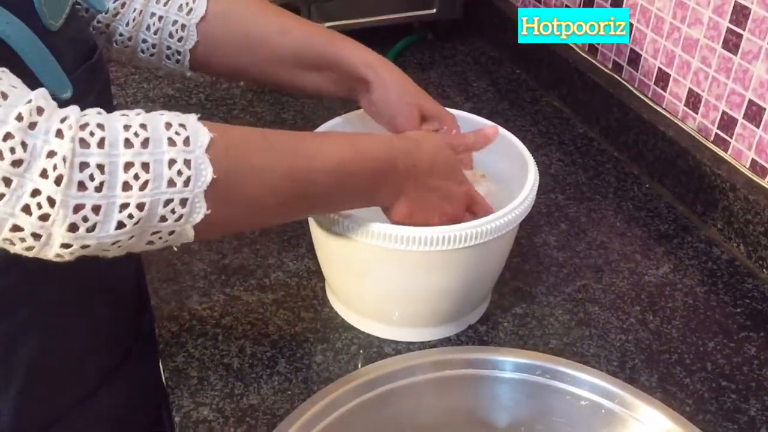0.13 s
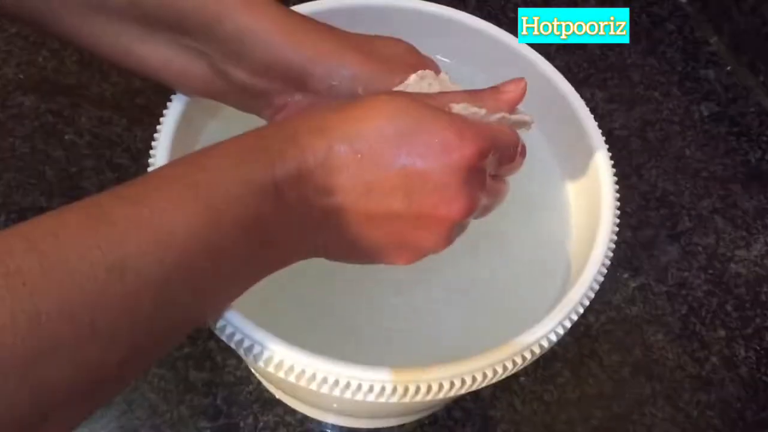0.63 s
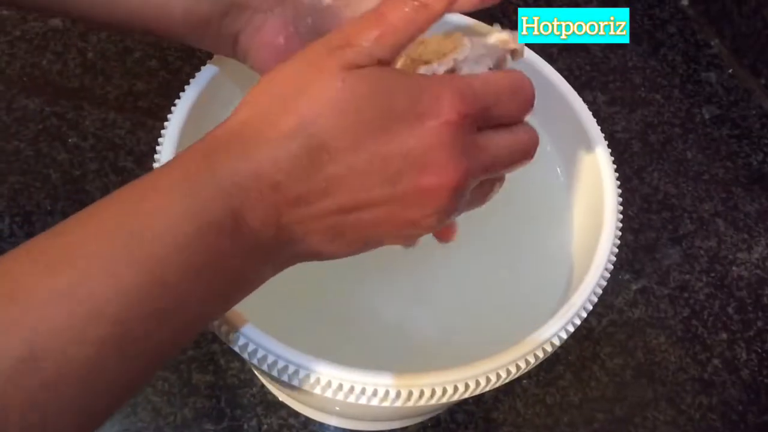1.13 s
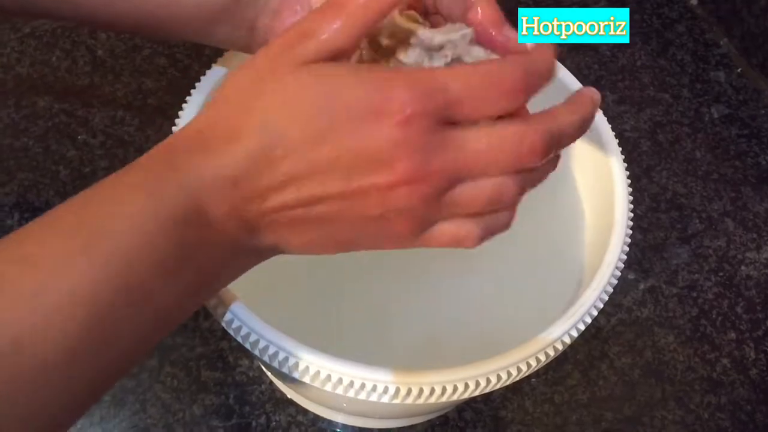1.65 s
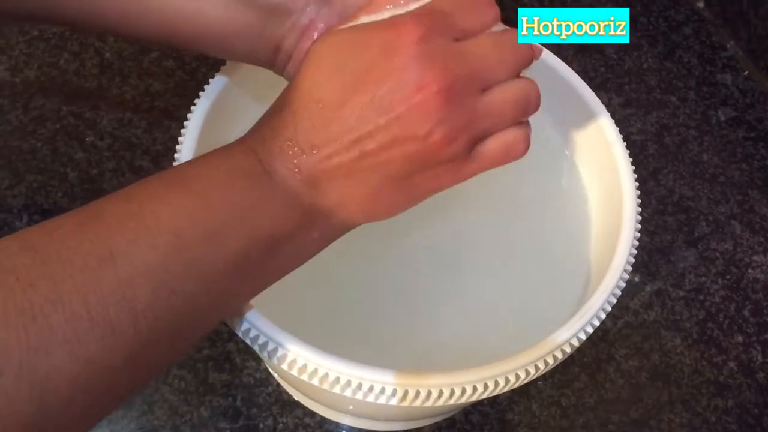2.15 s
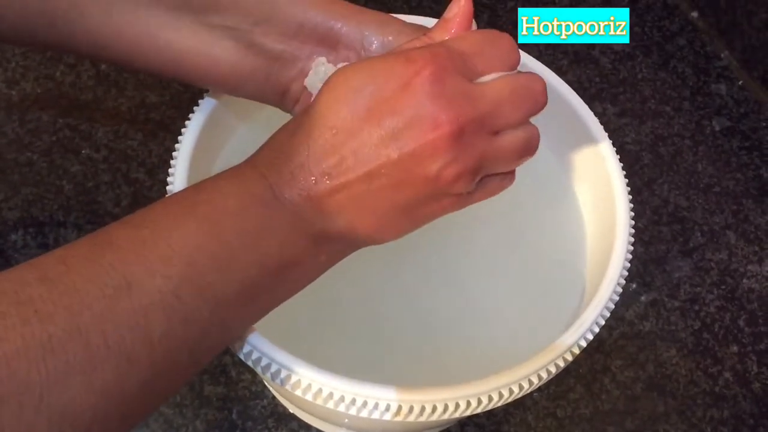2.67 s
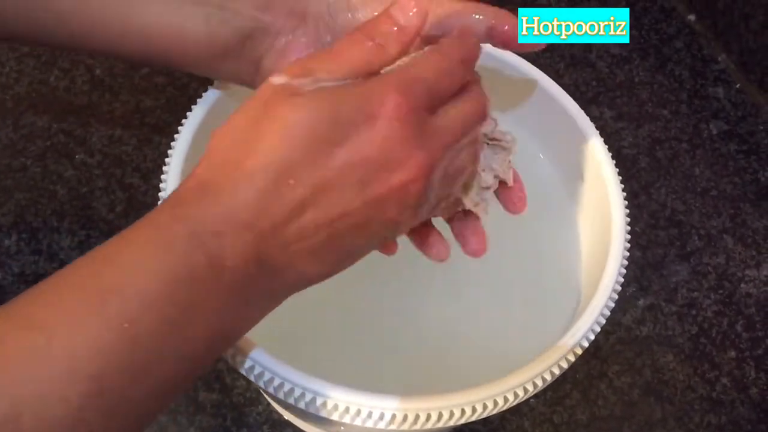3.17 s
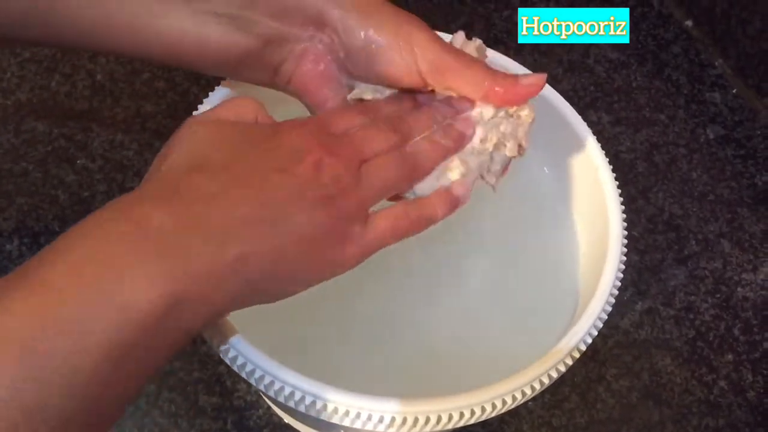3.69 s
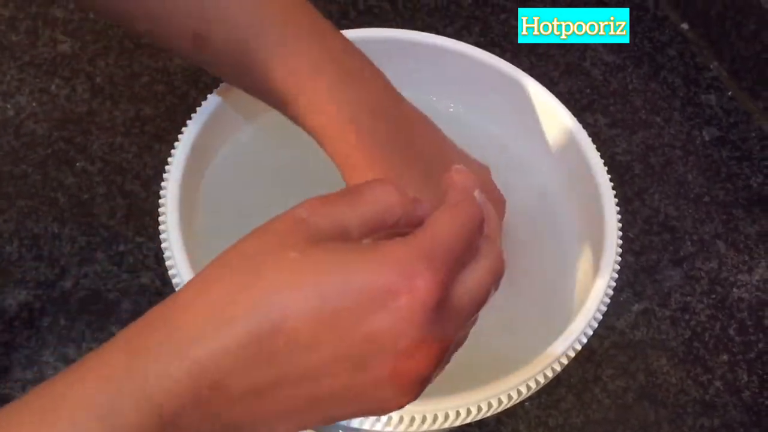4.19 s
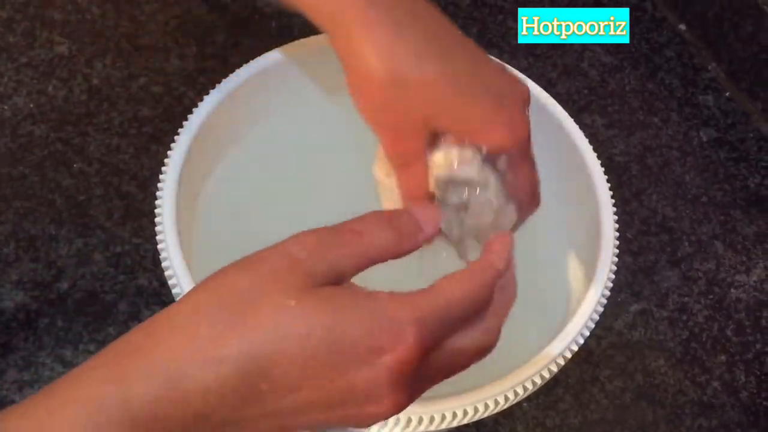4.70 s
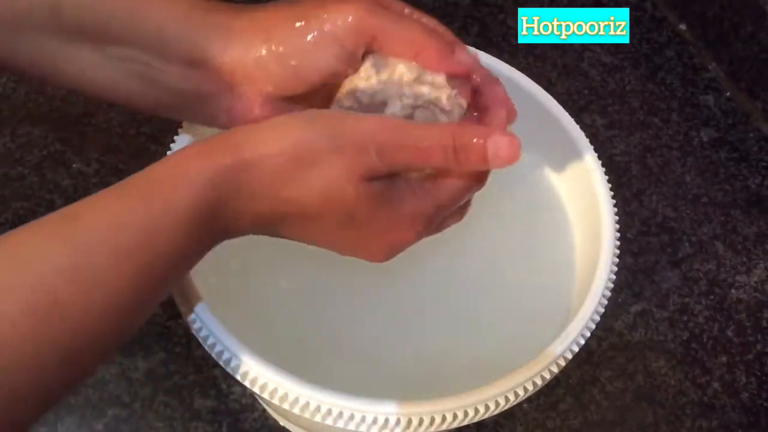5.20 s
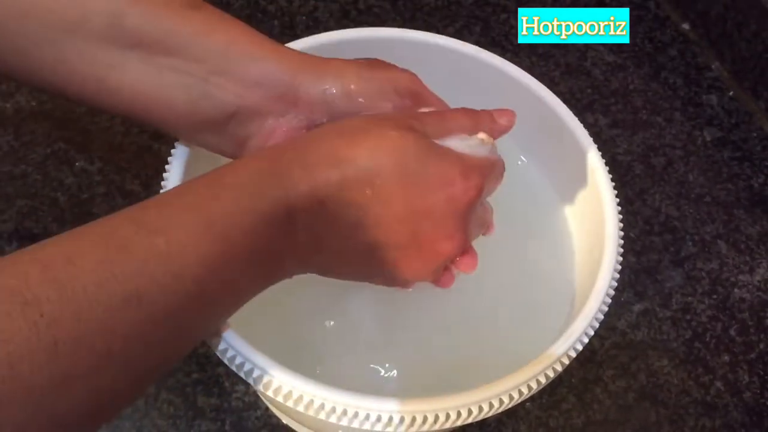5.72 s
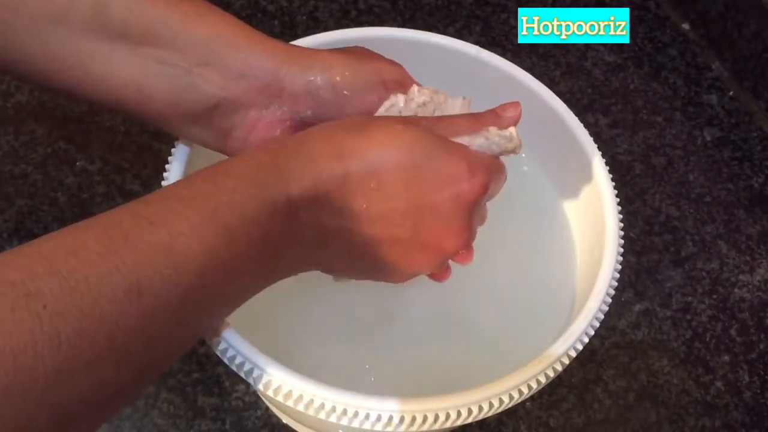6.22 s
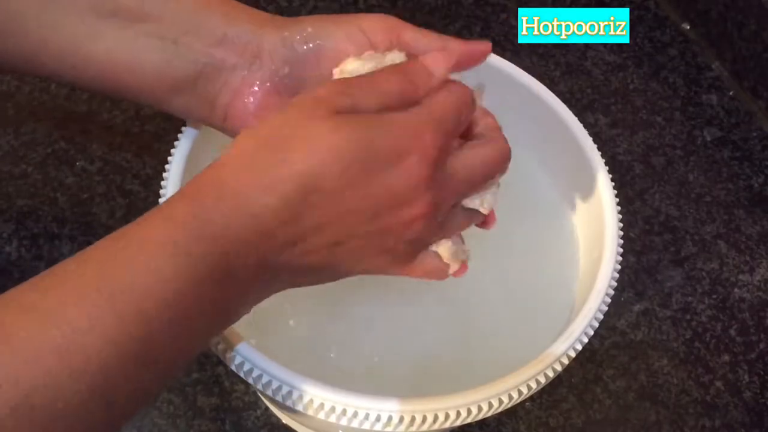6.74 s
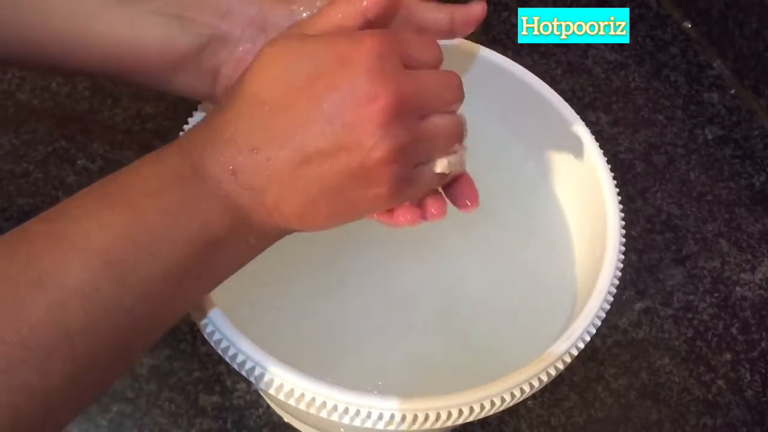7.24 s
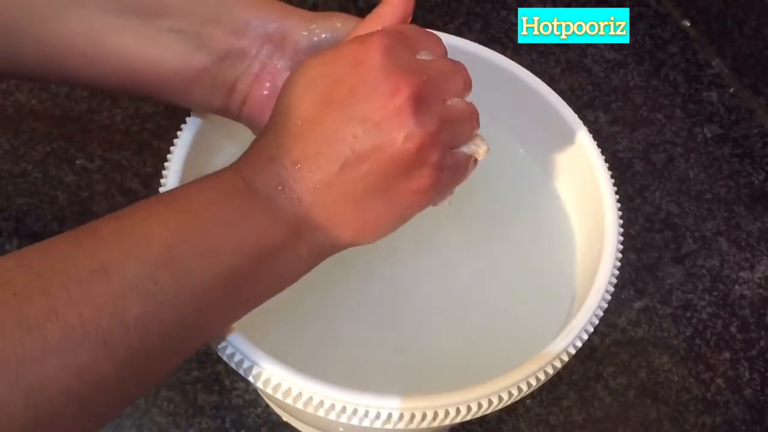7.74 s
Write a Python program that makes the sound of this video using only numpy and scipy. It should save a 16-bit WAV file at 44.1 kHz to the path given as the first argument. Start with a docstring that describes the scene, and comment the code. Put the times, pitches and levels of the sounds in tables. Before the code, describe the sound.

Close wet kneading: splashy gurgles dip briefly to silence, then sharp sticky snaps, crackles and bubbly drips, ending in a squirting squelch.

```python
"""In a small tiled kitchen, two hands squeeze wet dough over a plastic bowl of water, heard close up.
Sticky films smack as bursts of noise ringing in air pockets; drips ring as bubbles of rising pitch.
Swarms of tiny rings make squirting, gurgling and crackling, and short noise bursts make dry ticks.
An appliance drones and hums over air noise and a low rumble; early on, all fades out and in again."""
import sys
import numpy as np
from scipy import signal
from scipy.fft import rfft, irfft, next_fast_len
from scipy.io import wavfile
from scipy.ndimage import uniform_filter1d

SR = 44100
rng = np.random.default_rng(int(sys.argv[2]) if len(sys.argv) > 2 else 0)


def field_ratio(decibels):
    """Amplitude ratio for a level in dB (20 dB per decade); scalars and array-likes work."""
    return 10 ** (np.asarray(decibels, dtype=float) / 20)


def store_pcm(level_fs):
    """Save levels as 16-bit WAV."""
    pcm = np.round(np.clip(level_fs, -1, 1) * 32767).astype(np.int16)
    wavfile.write(sys.argv[1], SR, np.atleast_2d(pcm).T)


N = 347067  # length in samples
TIME = np.arange(N) / SR  # s
CUT_S = 0.53  # the middle of the fade, where the rumble also changes


def unit(x):
    """Scales a sound to rms 1."""
    return x / np.sqrt(np.mean(x ** 2) + 1e-20)


def noise():
    """White noise as long as the scene."""
    return rng.standard_normal(N)


def along(points, hz):
    """Reads values between (f/Hz, value) points, on a log frequency axis."""
    f, value = np.transpose(points)
    return np.interp(np.log(hz + 1), np.log(f + 1), value)


def filtered(x, response):
    """Shapes a sound by a response that depends on frequency."""
    size = next_fast_len(len(x) + 4096)  # spare room keeps the tail from wrapping onto the start
    spectrum = rfft(x, size) * response(np.fft.rfftfreq(size, 1 / SR))
    return irfft(spectrum, size)[:len(x)]


def resonance(f, hz, width_hz):
    """Response of one thing that rings at hz, with peak gain 1; a wider peak dies away sooner."""
    return 1j * f * width_hz / (hz * hz - f * f + 1j * f * width_hz + 1e-9)


def blips(s, hz, gain, cycles, rise, swell, size):
    """Sums dying sine rings that start at s, swell over some cycles and climb in pitch."""
    t = np.arange(size) / SR
    age = t * (hz / cycles)[:, None]  # 1 when the given cycles have passed
    turns = hz[:, None] * t * (1 + rise * np.minimum(age, 2) / 2)  # pitch is up by the share rise at age 1
    onset = (1 - np.exp(-t * hz[:, None] / swell)) ** 2
    ring = gain[:, None] * np.exp(-age * 2) * onset * np.sin(2 * np.pi * turns)
    where = np.round(s * SR).astype(int)[:, None] + np.arange(size)
    return np.bincount(where.ravel(), ring.ravel(), N + SR)[:N]


def swarm(hz, count, spread, cycles, swell, scatter_db, clump_db, size):
    """Random blips around a moving pitch, in short spurts that share pitch and loudness, rms 1."""
    s = rng.uniform(0, N / SR, count)
    sample = (s * SR).astype(int)
    spurt = sample // 350  # a spurt lasts 350 samples, about 8 ms
    spurt_db, spurt_pitch = rng.standard_normal((2, N // 350 + 1))[:, spurt]
    pitch = hz[sample] * np.exp(spread * (spurt_pitch + rng.standard_normal(count)))
    scatter = np.minimum(rng.exponential(size=count), 3)  # a few blips stand out, within a limit
    gain = field_ratio(scatter_db * scatter + clump_db * spurt_db)
    rings = blips(s, np.clip(pitch, 200, 15500), gain, np.full(count, cycles), .1, swell, size)
    return unit(rings)


def swells(rows, rise):
    """Gain of spells that climb and die away evenly in dB; rise is climb time over fade time."""
    s, db, fade_s = np.transpose(rows)[:3, :, None]
    after = (TIME - s) / np.maximum(fade_s, .01)
    drop_db = 20 * np.maximum(after, -after / rise)
    return np.sqrt(np.sum(field_ratio(db - drop_db) ** 2, axis=0))


def moving_pitch(rows):
    """Pitch that glides from peak to peak of the spells."""
    return np.interp(TIME, [row[0] for row in rows], [row[-1] for row in rows])


def air():
    """Broad room noise whose loudness varies softly in patches of time and pitch."""
    # spectrum of the quiet kitchen, only its shape counts: (f/Hz, level per Hz/dB)
    air_shape = [(45, -59), (75, -1.5), (150, -13), (250, -14.5), (420, -15.5), (750, -9.5), (1100, -14.5),
                 (2400, -18.5), (6000, -24), (10000, -22), (16000, -29)]
    z = signal.stft(noise(), nperseg=512)[2]
    patches = uniform_filter1d(rng.standard_normal(z.shape), 14, 0)  # smooth over pitch
    patches = uniform_filter1d(patches, 16, 1)  # smooth over time
    hiss = signal.istft(z * field_ratio(1.1 * unit(patches)), nperseg=512)[1][:N]
    hiss = unit(filtered(hiss, lambda f: field_ratio(along(air_shape, f))))
    return field_ratio(-67.5) * hiss


def drone():
    """The appliance's unsteady bands: noise passed twice through each narrow resonance."""
    # bands of the appliance: (f/Hz, width of each pass/Hz, rms level/dB)
    drone_bands = [(335, 62, -75), (370.5, 11, -79), (47.1, 16.5, -68.5)]
    out = np.zeros(N)
    for hz, width_hz, db in drone_bands:
        band = filtered(noise(), lambda f: resonance(f, hz, width_hz) ** 2)
        out += field_ratio(db) * unit(band)
    return out


def hum():
    """The appliance's thin hum: a 301 Hz sine whose loudness and phase waver slowly together."""
    waver = unit(filtered(noise(), lambda f: f < 5))  # changes slower than 5 Hz
    level = field_ratio(-74.5 + 0.5 * waver) * np.sqrt(2)  # the root turns rms into peak
    return level * np.sin(2 * np.pi * 301 * TIME + 0.85 * waver)


def rumble():
    """Low rumble of the building: deep noise that drops at the cut and partly swells back."""
    first_db, low_db, high_db = -48, -67, -59  # before the cut, after it, after the swell
    swell_s = 2.45  # middle of a swell 0.3 s long
    swollen = np.clip((TIME - swell_s) / .3 + .5, 0, 1)
    level_db = np.where(TIME < CUT_S, first_db, low_db + (high_db - low_db) * swollen)

    def deep(f):
        low = resonance(f, 14, 25) / (1 + (f / 40) ** 2)
        return low + field_ratio(-24) * resonance(f, 140, 400) ** 2

    return field_ratio(level_db) * unit(filtered(noise(), deep))


def squirts():
    """Pressed dough squirts water through its pores: swarms of tiny bubble rings with a high mist."""
    # spells of squirting: (peak t/s, peak level/dB, time to fade by 20 dB/s, pitch f/Hz)
    squirt_spells = [(0, -49.5, 0.31, 9240), (.2, -65, 1.6, 7740), (2.02, -66, 0.6, 4500),
                     (5.59, -61, 0.33, 4180), (7.41, -48.5, 0.13, 4360), (7.48, -39.5, 0.1238, 5730),
                     (7.69, -50, 0.32, 6560), (7.78, -41, 0.1, 6500)]
    squirt = swarm(moving_pitch(squirt_spells), 24000, spread=.16, cycles=6, swell=1.2,
                   scatter_db=4, clump_db=4, size=160)
    mist = swarm(np.full(N, 10500.0), 6000, spread=.2, cycles=3, swell=.8,
                 scatter_db=4, clump_db=3, size=80)
    return swells(squirt_spells, rise=0.56) * (squirt + field_ratio(-3) * mist)


def gurgles():
    """Water gurgles in the bowl: swarms of larger, lower bubble rings with a finer fizz."""
    # spells of gurgling: (peak t/s, peak level/dB, time to fade by 20 dB/s, at least 0.01, pitch f/Hz)
    gurgle_spells = [(.1, -52, 0.49, 716), (.2, -49.5, 0.02, 720), (1.945, -49, -0.22, 773),
                     (1.99, -52.5, 0.5, 786), (6.42, -57, -0.7, 786), (7.3, -59.5, 0.3, 707),
                     (7.35, -50.5, 0.21, 672), (7.46, -46, 0.14, 728)]
    gurgle = swarm(moving_pitch(gurgle_spells), 4000, spread=.1, cycles=5, swell=.8,
                   scatter_db=2, clump_db=2, size=1200)
    fizz = swarm(np.full(N, 2100.0), 6000, spread=.3, cycles=7, swell=.6,
                 scatter_db=4, clump_db=3.5, size=500)
    return swells(gurgle_spells, rise=0.19) * (gurgle + field_ratio(-2.5) * fizz)


def smacks():
    """A film tears in a burst of crackle that rings its air pocket, over a duller splat."""
    # wet smacks of skin and dough: (t/s, level/dB, pocket pitch f/Hz, splat level against the
    # pocket/dB, pocket width as a share of its pitch, kept within 0.05 and 0.7 below)
    smack_table = [(.003, -31, 3850, -7, 0.84), (0.017, -39, 4900, -10, 1), (0.069, -37.5, 4260, 6, 0.37),
                   (0.161, -36, 11100, -25, 0.26), (.19, -33, 4350, 2, 0.82),
                   (0.247, -37.5, 9300, -5, 0.13), (0.636, -40.5, 9300, -30, 0.1),
                   (.672, -42.5, 5330, -18, 0.13), (0.9975, -39.5, 12200, -8, 0.89),
                   (1.064, -38.5, 4700, -9.5, 0.8), (1.1136, -36.5, 9400, -40, 0.88),
                   (1.334, -48, 10500, -30, .5), (1.467, -47, 9100, -30, .4),
                   (1.5301, -35.5, 6200, -10, 0.8), (1.961, -39.5, 3740, -3, 0.94),
                   (2.0056, -31.5, 4620, -15, 0.57), (2.026, -31, 4860, -20, 0.18),
                   (2.078, -30, 4670, 1, 0.29), (2.1018, -31, 4030, -36, 0.27),
                   (2.166, -31.5, 4020, -35, 0.22), (2.193, -36, 5130, -19, 0.87),
                   (2.2579, -16, 9100, -19, 0.67), (2.411, -35, 10600, -22, 0.14),
                   (2.4434, -36, 7260, -18, 0.86), (2.5396, -21, 5700, -12, 1), (2.546, -25, 6630, -11, 1),
                   (2.7942, -41.5, 10200, -16, 0.38), (2.882, -41, 10800, -12, 0.3),
                   (2.902, -36.5, 10500, -15, 0.4), (3.255, -35, 10000, -13, 0.86),
                   (3.27, -38, 10400, -28, 0.23), (3.4241, -45, 9300, -17, 0.71), (3.44, -35, 6840, -14, 1),
                   (3.473, -42.5, 5450, -17.5, 0.89), (3.61, -45.5, 5350, -32, 0.83),
                   (3.759, -41.5, 5500, -11.5, 0.5), (3.809, -38.5, 9100, -20, 0.24),
                   (3.9481, -28.5, 8200, -15, 0.47), (3.952, -16.5, 7970, -20.5, 0.69),
                   (4.297, -41, 2830, 0, 1), (4.348, -30.5, 4200, -12, 0.91), (4.62, -48, 4160, -29, 0.52),
                   (4.679, -43.5, 5760, -44, 0.26), (4.796, -43, 10600, -24, 0.29),
                   (4.897, -41.5, 10400, -39, 0.32), (4.968, -31, 7000, 1.5, 0.86),
                   (5.034, -34.5, 9300, -3, 0.75), (5.0922, -34, 4970, -2, 0.84),
                   (5.258, -43, 9100, -10, 0.85), (5.303, -38.5, 7700, -5.5, 0.96),
                   (5.3288, -35, 10300, -9.5, 1), (5.5982, -31.5, 4050, -12.5, 0.35),
                   (5.6959, -29.5, 10000, -1.5, 0.83), (6.005, -29.5, 4130, -6, 0.32),
                   (6.2924, -38, 4600, -7, 0.87), (6.385, -46.5, 8900, 3.5, 0.77),
                   (6.75, -41, 6030, -20, 0.32), (6.776, -41.5, 9900, -39.5, 0.33),
                   (7.031, -46.5, 7700, -24, 0.45), (7.5947, -28, 9400, -37, 0.25),
                   (7.658, -28, 5670, -21, 0.59), (7.673, -23.5, 6960, -51, 0.46),
                   (7.684, -27.5, 6430, -50, 0.15), (7.701, -28, 7600, -40, 0.37),
                   (7.724, -20.5, 8800, -22, 0.094), (7.746, -23, 7440, -19.5, 1),
                   (7.779, -23.5, 6700, -44, 1), (7.811, -31, 5970, -55, 0.39)]
    out, t = np.zeros(N + SR), np.arange(SR // 10) / SR
    for s, db, hz, splat_db, width in smack_table:
        # a louder smack tears a larger film: 3 ms at -34 dB, twice as long for each 22 dB more
        length_s = .003 * 2 ** ((db + 34) / 22)
        age = t / length_s
        burst = rng.standard_normal(len(t)) * np.exp(-age) * (1 - np.exp(-age / 0.38)) ** 2
        burst[round(length_s * SR / 2)] += .7  # the moment the film snaps
        width_hz = np.clip(width, .05, .7) * hz

        def pocket_ring(f):
            return resonance(f, hz, width_hz) ** 2 + field_ratio(-21) * resonance(f, 6000, 9000) ** 2

        pocket = filtered(burst, pocket_ring)
        splat = filtered(burst, lambda f: resonance(f, 1110, 1680) ** 2)
        both = pocket / np.linalg.norm(pocket) + field_ratio(splat_db) * splat / np.linalg.norm(splat)
        loudness = np.sqrt(length_s * SR / 8)  # a longer burst holds more energy
        out[round(s * SR):][:len(t)] += field_ratio(db) * loudness * both
    return out[:N]


def kitchen(x, early_db, late_db):
    """Bowl and tiles answer at once, the room rings on; drawn anew at random every eighth of a second."""
    # how long the room rings: (f/Hz, time to die away by 60 dB/s)
    ring_times = [(400, 0.15), (1000, 0.45), (2800, 0.48), (7000, 0.29), (14000, 0.33)]
    out, step = np.zeros(N + 2 * SR), SR // 8
    for start in range(0, N, step):
        hz, t, z = signal.stft(rng.standard_normal(SR // 2), SR, nperseg=256)
        decay = field_ratio(-60 * t / along(ring_times, hz)[:, None])
        late = signal.istft(z * decay, SR, nperseg=256)[1]
        t = np.arange(len(late)) / SR
        early = rng.standard_normal(len(t)) ** 3 * np.exp(-(t / .013) ** 2)  # the cube makes it sparse
        answer = field_ratio(early_db) * early / np.linalg.norm(early)
        answer = answer + field_ratio(late_db) * late / np.linalg.norm(late)
        echo = signal.fftconvolve(x[start:start + step], answer)
        out[start + 60:][:len(echo)] += echo  # 60 samples late, about 1.4 ms
    return out[:N]


def bubbles():
    """Each drip leaves a bubble that rings and climbs in pitch."""
    # drips and trapped air: (t/s, level/dB, pitch f/Hz, life/cycles)
    bubble_table = [(.07, -40, 900, 7.8), (.095, -17.5, 775, 4.9), (.113, -26, 705, 8.8),
                    (.143, -28.5, 710, 6.3), (.194, -21.5, 874, 6), (.204, -28, 964, 5.9),
                    (0.199, -35.5, 1545, 13), (.281, -36, 2870, 14), (0.324, -30, 1990, 9.1),
                    (0.472, -38.5, 2490, 12), (1.937, -44, 670, 8.1), (1.963, -39, 760, 7.4),
                    (2.01, -37.5, 598, 8), (2.039, -40, 800, 6.8), (2.08, -35, 760, 10),
                    (2.104, -37.5, 810, 10), (2.261, -30.5, 2970, 7.9), (2.546, -40.5, 887, 21),
                    (2.544, -31.5, 1290, 14), (2.549, -40.5, 2250, 19), (3.218, -45, 3230, 7.2),
                    (3.953, -29, 3730, 7.2), (4.006, -32, 2570, 4.7), (4.022, -27.5, 843, 2.8),
                    (4.145, -45, 1450, 7.7), (4.152, -51.5, 2980, 16), (4.183, -37.5, 1426, 4.9),
                    (4.182, -40, 2710, 5.8), (4.349, -32.5, 3470, 10), (4.734, -45, 1540, 11),
                    (4.733, -46.5, 2980, 13), (4.798, -43.5, 3210, 19), (4.964, -29.5, 1480, 8.9),
                    (4.969, -28.5, 975, 14), (4.969, -40, 3910, 20), (4.999, -30.5, 920, 12),
                    (5.032, -31, 857, 11), (5.033, -36, 1354, 16), (5.116, -31.5, 2390, 16.4),
                    (5.1954, -47, 5600, 15), (5.258, -39.5, 3270, 14), (5.26, -36.5, 5350, 8),
                    (5.376, -42.5, 5550, 11), (5.4011, -48, 5100, 8.8), (5.43, -46.5, 5500, 14),
                    (5.335, -37, 2315, 19), (5.538, -44, 1800, 15), (5.554, -32, 2450, 6.3),
                    (5.689, -26, 823, 4.1), (6.007, -37.5, 1540, 6.6), (6.305, -54, 3020, 12),
                    (6.347, -37.5, 1910, 2.7), (6.649, -47, 1430, 18), (6.714, -50, 2000, 14),
                    (6.712, -54, 2630, 15), (5.68, -34.5, 3020, 9.1), (7.332, -43.5, 2480, 10),
                    (7.367, -40, 2500, 8), (7.39, -28.5, 580, 10), (7.449, -30.5, 573, 8),
                    (7.474, -33.5, 705, 7.1)]
    s, db, hz, cycles = np.transpose(bubble_table)
    return blips(s, hz, field_ratio(db), np.maximum(cycles, 2), 0.05, swell=.6, size=4000)


def crackle():
    """Sparse crackling as small strands of dough let go of the skin: a swarm of very short rings."""
    # sticky dough creeping between the fingers: (peak t/s, peak level/dB, time to fade by 20 dB/s,
    # at least 0.01)
    crackle_spells = [(1.05, -53.5, -0.08), (1.7, -69, 0.38), (2.4, -63, 0.27), (2.93, -58, 0.17),
                      (3.27, -63, 0.2), (3.7, -77.5, 3.3), (5.06, -59.5, 0.26), (6.38, -52.5, -0.05),
                      (6.78, -68.5, 0.44)]
    strands = swarm(np.full(N, 9000.0), 3500, spread=.22, cycles=3, swell=.8,
                    scatter_db=4.5, clump_db=3, size=120)
    steady_creep = field_ratio(-90)
    return (swells(crackle_spells, rise=0.86) + steady_creep) * strands


def ticks():
    """Strands snap close by: noise that dies within milliseconds, too near and faint to wake the room."""
    # dry snaps: (t/s, peak level/dB)
    tick_table = [(1.8033, -51), (2.7754, -52.5), (2.795, -42), (2.988, -43), (3.2899, -35.5), (3.397, -46),
                  (3.4424, -35), (3.475, -42), (3.612, -44), (3.6644, -43), (3.812, -45), (4.2968, -37),
                  (6.348, -41), (7.28, -42)]
    out, t = np.zeros(N), np.arange(SR // 100) / SR
    for s, db in tick_table:
        snap = rng.standard_normal(len(t)) * np.exp(-t / 0.00093)
        snap = filtered(snap, lambda f: resonance(f, 5200, 13600) ** 2)
        out[round(s * SR):][:len(t)] += field_ratio(db) * snap / np.abs(snap).max()
    return out


def mic_rolloff(x):
    """The microphone rolls off the treble: two equal low-pass steps at 11500 Hz."""
    return filtered(x, lambda f: 1 / (1 + 1j * f / 11500 / 1.034 - (f / 11500) ** 2) ** 2)


def scene():
    """Hands and water in the kitchen, over its noise."""
    background = air() + drone() + hum() + rumble()
    wet = mic_rolloff(squirts() + gurgles() + smacks() + bubbles() + crackle())
    echoes = kitchen(wet, early_db=-6.0, late_db=-4.5)
    mix = field_ratio(-3.0) * wet + echoes + ticks() + background
    return mix[None]  # one channel


def top_cut(x):
    """Nothing passes above the cut-off."""
    return signal.sosfilt(signal.butter(12, 15990, fs=SR, output="sos"), x)


def record(dry):
    """Fades the sound out to the cut and in again, never deeper than -51 dB."""
    fade_out_s, fade_in_s = 0.33, 0.43
    since = TIME - CUT_S
    fade = np.clip(np.maximum(-since / fade_out_s, since / fade_in_s), 0, 1)
    return top_cut(dry * np.maximum(fade, field_ratio(-51)))


dry = scene()
out = record(dry)
store_pcm(out)
```